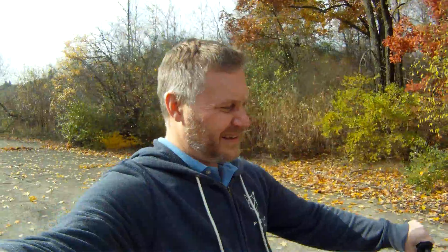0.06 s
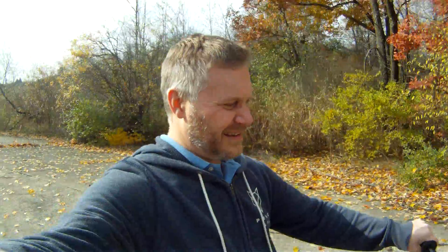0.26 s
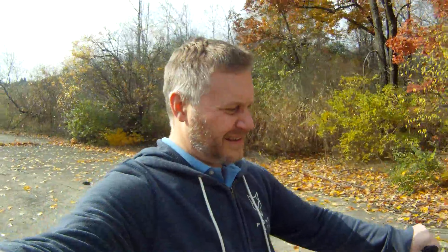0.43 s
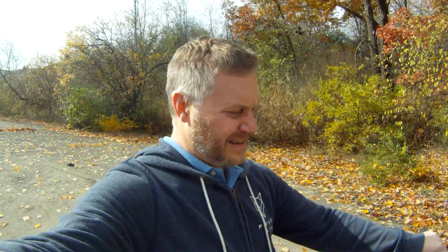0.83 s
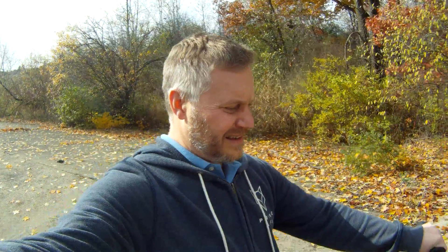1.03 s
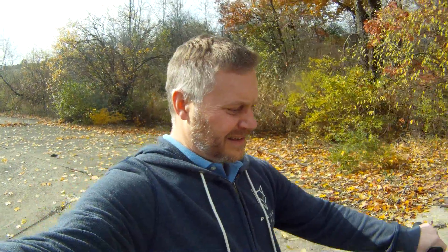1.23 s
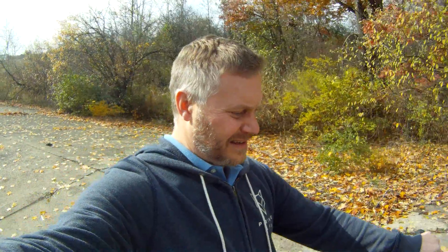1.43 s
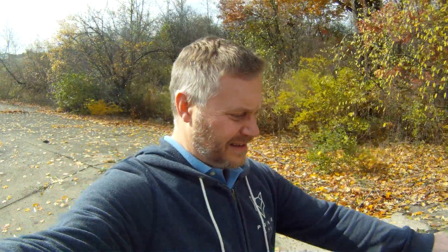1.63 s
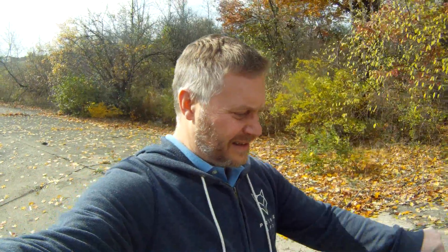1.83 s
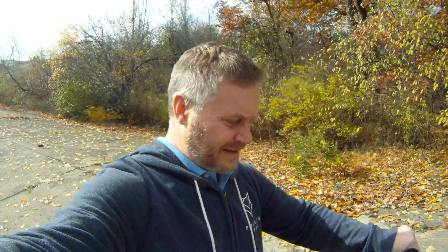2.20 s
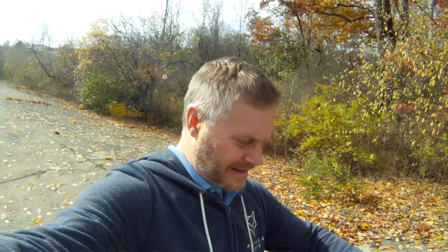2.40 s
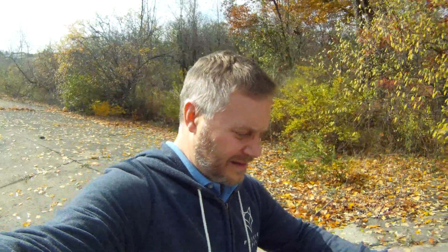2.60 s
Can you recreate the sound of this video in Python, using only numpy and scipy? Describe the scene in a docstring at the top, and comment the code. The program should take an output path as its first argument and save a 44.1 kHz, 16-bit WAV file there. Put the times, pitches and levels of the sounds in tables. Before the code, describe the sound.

Thin bike brake squeal ending in a click, with soft tyre hiss and wind.

```python
"""Slow bicycle with a squealing brake

Tyres hiss over leaf-strewn pavement, an arm's length from the rider, while wind rumbles and puffs
on the microphone. The brake pad sticks and slips in a thin squeal that turns rough and lets go with
a click; parts tick and a dry leaf crunches under a tyre. The recorder holds its samples, which
mirrors every sound into the treble."""
import sys
import numpy as np
from scipy import signal
from scipy.fft import rfft, irfft
from scipy.io import wavfile

SR = 44100
rng = np.random.default_rng(int(sys.argv[2]) if len(sys.argv) > 2 else 0)


def wav_out(sig):
    """Save sig, one row per channel (or a flat mono array), as 16-bit PCM at SR to the path in sys.argv[1]."""
    wavfile.write(sys.argv[1], SR, np.round(np.clip(np.atleast_2d(sig).T, -1, 1) * 32767).astype(np.int16))


N = 121275
T = np.arange(N) / SR

# airy hiss at the sides: (frequency [Hz], relative level [dB])
AIR_SPECTRUM = [(100, -21.5), (300, -2), (1000, -2.5), (2200, -5.5), (3300, -3.5), (5000, -0.5),
                (5800, -6.5)]
# wind on the microphone: (frequency [Hz], relative level [dB])
WIND_SPECTRUM = [(12, -17), (25, 0), (50, -2), (100, -9), (170, -14), (250, -16), (400, -25.5), (800, -48)]
# swell of the rumble: (time [s], level [dB])
WIND_GUSTS = [(0, -54.5), (.4, -57), (.5, -54), (.65, -58.5), (.77, -58), (.9, -54.5), (1.07, -55.5),
              (1.2, -57), (1.4, -55), (1.75, -59.5), (1.9, -53), (2.05, -54), (2.35, -56.5), (2.48, -54.5),
              (2.58, -56.5), (2.64, -53.5), (2.75, -57.5)]
# eddies hitting the microphone: (time [s], peak level [dB], half length [s])
WIND_PUFFS = [(0.2057, -27.5, 0.0021), (0.2347, -34, 0.0028), (.6188, -33.5, 0.0024),
              (0.938, -40.5, 0.0043), (1.2592, -30.5, 0.0028), (2.032, -35, 0.0031), (2.055, -34, 0.0056),
              (2.1164, -29, 0.0031), (2.1465, -29.5, 0.002), (2.2354, -38, 0.00326), (2.305, -35, 0.0024),
              (2.4303, -27, 0.0023), (2.462, -39.5, 0.0034), (2.4706, -39.5, 0.0024)]
# tyre hiss: (frequency [Hz], relative level [dB])
TYRE_SPECTRUM = [(100, -7), (250, -2.5), (400, 2), (700, -0.5), (1100, -1.5), (1650, -4), (2000, -1),
                 (2350, 1), (2800, -9), (3500, -6.5), (4300, -12), (5600, -12)]
# crackle of grit: (frequency [Hz], relative level [dB])
GRIT_SPECTRUM = [(800, -29), (2000, 8), (3300, 7), (5500, 3.5)]
# cracking leaf: (frequency [Hz], relative level [dB])
LEAF_SPECTRUM = [(500, -15), (1000, -4.5), (1500, -7), (1950, 7.5), (2500, -3), (3300, -5.5), (4200, -15.5),
                 (5500, -9.5)]
# clusters of cracks in the leaf: (peak time [s], level [dB], half length [s])
LEAF_CRUNCHES = [(2.443, -54, 0.0034), (2.454, -55.5, 0.0072), (2.477, -52, 0.012), (2.487, -48.5, 0.0024),
                 (2.527, -57, 0.0023), (2.586, -54, 0.0058)]
# ticks of pad, wheel and grit: (time [s], level [dB], centre [Hz], width [Hz], decay [s])
PART_TICKS = [(0.055, -50.5, 3000, 2000, 0.002), (0.209, -57, 2220, 2180, 0.023),
              (0.291, -54, 3100, 2000, 0.0026), (0.464, -53, 2240, 1500, 0.008),
              (0.743, -61, 3850, 2000, 0.0028), (0.805, -61, 2980, 1500, .003),
              (0.851, -57, 3080, 1200, 0.004), (0.89, -46.5, 3620, 1190, 0.0036),
              (.893, -47, 3530, 696, 0.0055), (0.901, -51, 2400, 1800, 0.0033),
              (0.933, -60, 2818, 2500, .004), (1.036, -48, 3600, 2000, .003),
              (1.2576, -42, 3030, 3500, 0.0026), (1.266, -54.5, 2960, 2000, 0.016),
              (1.335, -42, 2340, 1010, 0.0017), (1.385, -53, 2730, 1500, 0.0052),
              (1.556, -52.5, 1960, 1400, .005), (1.9408, -46, 3670, 3840, 0.0026),
              (2.119, -53, 2040, 1770, 0.01), (2.261, -56, 3130, 2500, 0.0026),
              (2.585, -48, 3170, 3040, 0.0013)]
# contacts as the brake lets go: (time [s], level [dB])
BRAKE_CLICKS = [(1.1018, -27.5), (1.1086, -43.5), (1.1178, -37), (1.1186, -36), (1.121, -40), (1.1207, -57),
                (1.1231, -39), (1.1404, -43), (1.439, -37), (1.4435, -37.5)]
# ringing modes of the brake: (frequency [Hz], relative level [dB], time to fall 60 dB [s])
BRAKE_RING = [(2430, -15.5, 0.033), (2880, 1, 0.0049), (3340, 5.5, 0.0045), (3530, -15, 0.0022)]
# path of the squeal: (time [s], pitch of the lead harmonic [Hz], level [dB], roughness [0-1])
SQUEAL_PATH = [(.695, 3180, -79, .5), (0.714, 3395, -63, 0.11), (.746, 3460, -57.5, 0.07),
               (.785, 3412, -59, 0.12), (0.832, 3425, -58, 0.03), (.855, 3450, -72, 0.52),
               (0.875, 3390, -58, 0.21), (0.917, 3420, -63.5, 0), (.95, 3440, -61.5, 0.55),
               (.972, 3356, -66, 0.5), (.997, 3403, -68.5, 0.72), (1.027, 3294, -60.5, 0.23),
               (1.052, 3310, -73, 0.38), (1.08, 3300, -78, 0.85)]
# overtones of the stick-slip cycle: (harmonic [number], relative level [dB])
SQUEAL_HARMONICS = [(3, -6), (4, 3.5), (5, -20)]


def undb(db):
    """Decibels to gain."""
    return 10 ** (np.asarray(db) / 20)


def unit(x):
    """Scale to rms 1."""
    return x / np.sqrt(np.mean(x ** 2))


def colour(x, spectrum):
    """EQ a sound along (frequency [Hz], level [dB]) points; rms 1."""
    hz, db = np.array(spectrum).T
    freqs = np.maximum(np.fft.rfftfreq(N, 1 / SR), 1)
    gain = undb(np.interp(np.log(freqs), np.log(hz), db))
    return unit(irfft(rfft(x) * gain, N))


def band(x, hz, width_hz):
    """One broad resonance; rms 1."""
    return unit(signal.lfilter(*signal.iirpeak(hz, hz / width_hz, fs=SR), x))


def wander(rate_hz):
    """Smooth random modulation that rolls off above the given rate; rms 1."""
    freqs = np.fft.rfftfreq(N, 1 / SR)
    return unit(irfft(rfft(rng.standard_normal(N)) * np.exp(-(freqs / rate_hz) ** 2), N))


def air(level_db=-75):
    """A faint bed of diffuse hiss."""
    return undb(level_db) * colour(rng.standard_normal(N), AIR_SPECTRUM)


def wind_rumble(flicker_db=0.5):
    """Wind on the microphone: a low rumble that rides the gusts."""
    rumble = colour(rng.standard_normal(N), WIND_SPECTRUM)
    gust_db = np.interp(T, *np.array(WIND_GUSTS).T)
    return rumble * undb(gust_db + flicker_db * wander(20))


def wind_puffs(leak_hz=37.8, damping=1.54):
    """Each eddy is a short dip in pressure; the microphone leaks bass, so it rebounds as a soft thump."""
    omega = 2 * np.pi * leak_hz
    bass_leak = signal.bilinear([1, 0, 0], [1, damping * omega, omega ** 2], SR)
    out = np.zeros(N)
    for time, db, half_length in WIND_PUFFS:
        dip = 1e-12 - np.exp(-np.minimum(((T - time) / half_length) ** 2, 50))
        thump = signal.lfilter(*bass_leak, dip)
        out += undb(db) * thump / np.abs(thump).max()
    return out


def tyres(hiss_db=-60.5, sway_db=0.5, grit_db=-67, grains_per_s=180):
    """Rolling tyres lay down an even hiss with a fine crackle of grit."""
    hiss = colour(rng.standard_normal(N), TYRE_SPECTRUM) * undb(hiss_db + sway_db * wander(7.4))
    size_db = np.minimum(14 * rng.exponential(size=N), 9)  # capped, so no grain sticks out
    hits = rng.random(N) < grains_per_s / SR
    grains = hits * undb(size_db) * rng.choice([-1, 1], N)
    return hiss + undb(grit_db) * colour(grains, GRIT_SPECTRUM)


def leaf_crunch(cracks_per_s=5000):
    """A dry leaf gives way under the tyre in a few clusters of tiny cracks."""
    cracks = rng.standard_normal(N) * (rng.random(N) < cracks_per_s / SR)
    envelope = sum(undb(db) * np.exp(-0.5 * ((T - time) / half_length) ** 2)
                   for time, db, half_length in LEAF_CRUNCHES)
    return colour(cracks, LEAF_SPECTRUM) * envelope


def part_ticks(attack_s=0.00063):
    """Pad, wheel and grit scuff briefly, each a fast-dying noise burst in one broad resonance."""
    out = np.zeros(N)
    for time, db, hz, width, decay in PART_TICKS:
        age = np.maximum(T - time, 0)
        burst = band(band(rng.standard_normal(N), hz, width), hz, width)
        envelope = np.minimum(age / attack_s, 1) * np.exp(-np.minimum(age / decay, 20))
        out += undb(db) * burst * envelope
    return out


def brake_clicks(attack_s=0.00073, detune=0.018):
    """The brake snaps free and chatters; each contact rings the same short modes, slightly detuned."""
    out = np.zeros(N)
    for time, db in BRAKE_CLICKS:
        age = np.maximum(T - time, 0)
        attack = np.minimum(age / attack_s, 1)
        for hz, mode_db, t60 in BRAKE_RING:
            pitch = hz * (1 + detune * rng.standard_normal())
            decay = undb(-60 * np.minimum(age / t60, 10))
            out += undb(db + mode_db) * np.sin(2 * np.pi * pitch * age) * attack * decay
    return out


def brake_squeal(lead_harmonic=4, jitter_hz=72.5, chatter_hz=165, flutter_db=7.5, fade_s=0.007):
    """The pad sticks and slips; as it loses grip, the tone wavers, chatters and frays into rubbing."""
    times, hz, db, roughness = np.array(SQUEAL_PATH).T
    rough = np.interp(T, times, roughness)
    pitch = np.interp(T, times, hz) + jitter_hz * rough * wander(160)
    phase = 2 * np.pi * np.cumsum(pitch / lead_harmonic) / SR
    tone = np.sqrt(2) * sum(undb(level) * np.sin(k * phase) for k, level in SQUEAL_HARMONICS)
    # a narrow band of noise around the stick-slip fundamental
    rub = wander(140) * np.sin(phase) + wander(140) * np.cos(phase)
    chatter = 1 + rough * np.sin(2 * np.pi * chatter_hz * T + wander(27))
    voice = np.sqrt(1 - rough ** 2) * tone * chatter + undb(-2) * rough * rub
    gate = np.clip(np.minimum(T - times[0], times[-1] - T) / fade_s, 0, 1)
    level_db = np.interp(T, times, db) + flutter_db * rough * wander(140)
    return voice * gate * undb(level_db)


def scene():
    """Bicycle and wind sit in the centre, with a trace of air for width."""
    bicycle = brake_squeal() + brake_clicks() + part_ticks() + leaf_crunch() + tyres()
    mid = bicycle + wind_rumble() + wind_puffs()
    side = air()
    return np.array([mid + side, mid - side])


def record(dry):
    """The recorder samples slowly and holds each value, mirroring the sound upward; the top is then cut."""
    hold_hz, anti_alias_hz, top_hz = 12000, 5650, 15200
    slow = signal.resample_poly(dry, hold_hz, SR, axis=1)
    slow = signal.sosfiltfilt(signal.butter(2, anti_alias_hz, fs=hold_hz, output="sos"), slow)
    stairs = np.repeat(slow, 4, axis=1)
    held = signal.resample_poly(stairs, SR, 4 * hold_hz, axis=1)[:, :N]
    noise_floor = undb(-78) * rng.standard_normal(N)
    high_cut = signal.ellip(12, 0.2, 70, top_hz, fs=SR, output="sos")
    return signal.sosfilt(high_cut, held + noise_floor)


dry = scene()
out = record(dry)
wav_out(out)
```